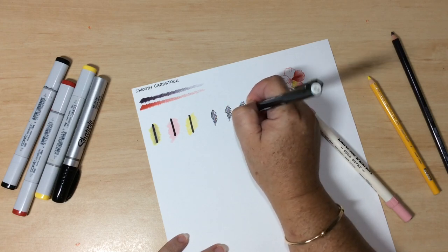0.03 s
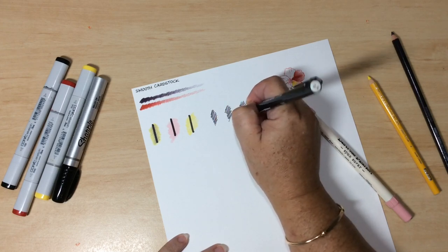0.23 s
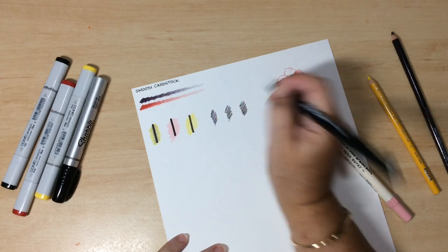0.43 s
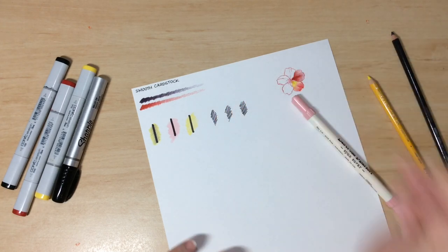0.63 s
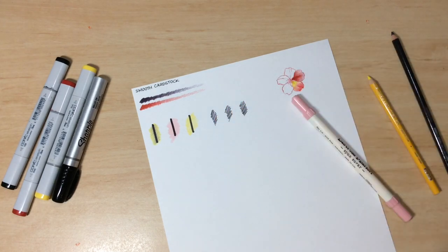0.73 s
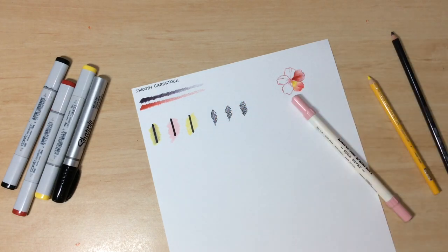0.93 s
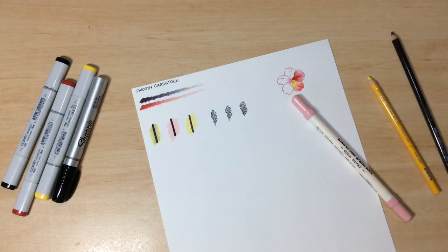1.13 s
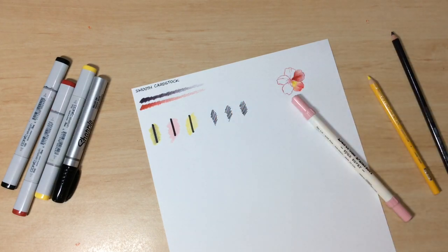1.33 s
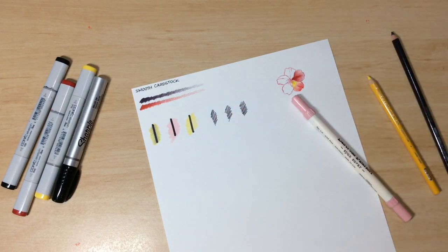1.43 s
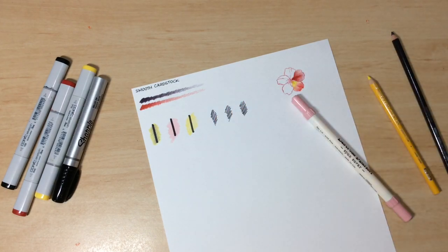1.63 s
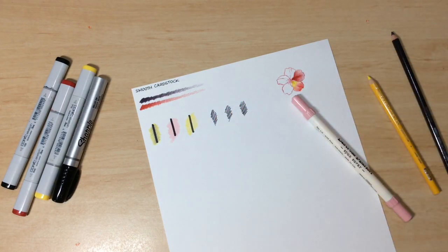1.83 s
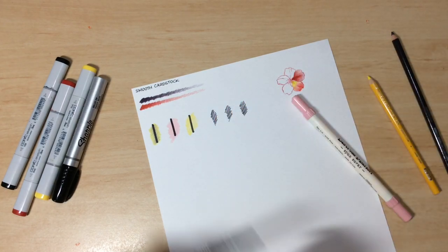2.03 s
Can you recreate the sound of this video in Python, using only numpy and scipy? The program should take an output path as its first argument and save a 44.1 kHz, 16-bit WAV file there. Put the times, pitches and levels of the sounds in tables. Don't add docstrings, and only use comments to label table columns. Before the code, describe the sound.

A plastic pen cap snaps shut sharply at about 1.87 seconds, preceded from 1.74 by a quick cluster of ticks, a brief scraping rub and tiny squeak. Earlier, faint pen strokes scratch paper from 0 to 0.35, then soft rustles and barely audible touches; a dull woody knock lands at 1.19. Faint ticks follow the snap. Close microphone, small room, steady low fan hum and soft hiss.

```python
import sys
import numpy as np
from scipy import signal
from scipy.io import wavfile
from scipy.ndimage import uniform_filter1d

SR = 44100
rng = np.random.default_rng(int(sys.argv[2]) if len(sys.argv) > 2 else 0)


def undo_db(level):
    steps = np.asarray(level, float) / 20
    return 10 ** steps


def master_out(mix):
    frames = np.transpose(np.atleast_2d(mix))
    ceiling = np.clip(frames, -1, 1)
    pcm = np.round(ceiling * 32767).astype(np.int16)
    wavfile.write(sys.argv[1], SR, pcm)


N = 91463
T = np.arange(N) / SR


def band(x, hz, width_hz):
    return signal.lfilter(*signal.iirpeak(min(hz, 0.45 * SR), hz / width_hz, fs=SR), x)


def highpass(x, hz):
    return signal.sosfilt(signal.butter(2, hz, "high", fs=SR, output="sos"), x)


def unit(x):
    return x / np.sqrt(np.mean(x ** 2))


def walk(rate_hz):
    k = int(SR / rate_hz)
    return unit(uniform_filter1d(uniform_filter1d(rng.standard_normal(N), k), k))


def noise_band(hz, width_hz):
    return unit(band(rng.standard_normal(N), hz, width_hz))


def band_sum(x, bands):
    return sum(undo_db(db) * band(x, hz, width_hz) for hz, width_hz, db in bands)


# (frequency [Hz], width [Hz], level [dB])
CRACK_BANDS = [(3470, 2100, 6.5), (5600, 1700, 3), (8000, 2200, 1.5), (13900, 3100, -15)]


def add_contact(out, at_s, modes, crack_db):
    rise_cycles, crack_rise_s, crack_decay_s = 0.52, 0.0001, 0.00052
    i = int(at_s * SR) + 1
    t = T[i:i + 4096] - at_s
    ring = np.zeros(len(t))
    for k, (hz, db, t60_s) in enumerate(modes):
        sign = (-1) ** (k + 1)
        swell = 1 - np.exp(-t * max(hz, 1500) / rise_cycles)
        ring += sign * undo_db(db - 60 * t / t60_s) * np.sin(2 * np.pi * hz * t) * swell
    burst = rng.standard_normal(len(t)) * np.exp(-t / crack_decay_s) * (1 - np.exp(-t / crack_rise_s))
    out[i:i + 4096] += ring + undo_db(crack_db + 8) * band_sum(burst, CRACK_BANDS)


def strike(times_s, contacts, modes, centre_hz):
    out = np.zeros(N)
    for at_s, (db, tilt_db_oct, crack_db) in zip(times_s, contacts):
        tilted = [(hz, db + mode_db + tilt_db_oct * np.log2(hz / centre_hz), t60_s)
                  for hz, mode_db, t60_s in modes]
        add_contact(out, at_s, tilted, db + crack_db)
    return out


# (frequency [Hz], level [dB], t60 [s])
CAP_MODES = [(334, -14.5, 0.0082), (640, -16, 0.014), (1400, -33, 0.012), (2742, -0.5, 0.051),
             (3200, -22.5, .015), (4060, -4, 0.017), (5160, -7, 0.0035), (5944, -1.5, 0.014),
             (6260, -25.5, 0.0086), (8180, 1.5, 0.0057), (9060, -5, 0.0062), (9830, -12, 0.0083),
             (12400, -38, .007), (14000, -24.5, .003)]
SNAP_TIMES = [1.8641, 1.8644, 1.8649, 1.8684, 1.8716, 1.8750, 1.8862]
# (level [dB], brightness [dB/octave], crack [dB])
SNAP_CONTACTS = [
    (-44, -3.5, -3),
    (-19.5, 14, -4.5),
    (-16, 1.5, -1),
    (-21, 13, -0.5),
    (-32, 7.5, 1.5),
    (-36.5, -2.5, -14),
    (-58.5, -4, -16),
]


def cap_snap():
    return strike(SNAP_TIMES, SNAP_CONTACTS, CAP_MODES, 6300)


# (time [s], level [dB], low ring [Hz], high ring [Hz], high ring level [dB])
TICKS = [(.735, -54, 2280, 2380, 7), (1.7432, -44, 3280, 4400, 2), (2.064, -53, 6000, 12000, -2.5),
         (.546, -59, 10800, 12500, 2), (1.093, -52.5, 11500, 14000, 2), (1.66, -42, 4800, 9400, -20),
         (1.700, -51, 5500, 11000, -6), (1.7444, -28, 1750, 6000, -2.5), (1.755, -50, 4000, 7000, -20),
         (1.7737, -33, 1300, 5500, -13), (1.7754, -35, 2700, 5600, 7), (1.7835, -40.5, 2000, 5800, 11),
         (1.7894, -35, 2600, 5600, -4), (1.7926, -52, 2900, 5800, -5), (1.8252, -30, 2700, 10500, 10),
         (1.8276, -38.5, 1226, 9100, 14.5), (1.8287, -26, 5500, 9400, 6.5), (1.8308, -26.5, 3000, 8700, 3),
         (1.8345, -45, 2900, 12000, 5), (2.003, -45, 9000, 13000, -6)]


def plastic_ticks():
    cycles = 13
    out = np.zeros(N)
    for at_s, db, low_hz, high_hz, high_db in TICKS:
        modes = [(low_hz, db, cycles / low_hz), (high_hz, db + high_db, 1.8 * cycles / high_hz)]
        add_contact(out, at_s, modes, db - 14)
    return out


# (frequency [Hz], level [dB], t60 [s])
NIB_PING = [(4850, -57, 0.024), (6000, -67, .01)]


def nib_flick():
    out = np.zeros(N)
    add_contact(out, 0.290, NIB_PING, -80)
    return out


# (time [s], level [dB])
RUB_LEVEL = [
    (1.788, -70),
    (1.791, -42.5),
    (1.803, -54),
    (1.821, -47.5),
    (1.822, -45),
    (1.831, -36),
    (1.837, -48.5),
    (1.846, -95),
    (1.863, -42.5),
]
# (frequency [Hz], width [Hz], level [dB])
RUB_BANDS = [(880, 900, -5), (2760, 4300, 8), (5800, 2200, -8.5), (8200, 2900, -25), (12000, 5000, -20)]


def cap_rub():
    noise = rng.standard_normal(N)
    grain_db = np.minimum(3.0 * rng.exponential(size=N), 9)
    grains = noise * undo_db(grain_db) * undo_db(1.5 * walk(500))
    s, db = np.array(RUB_LEVEL).T
    rubbing = (T > s[0]) * (T < s[-1])
    return unit(band_sum(grains, RUB_BANDS)) * undo_db(np.interp(T, s, db)) * rubbing


# (frequency [Hz], width [Hz], level [dB])
SQUEAK_LINES = [(6120, 190, -31), (7940, 440, -31), (2800, 370, -58)]


def cap_squeak():
    end_s, rise_s = 1.864, 0.0022
    creep = np.exp(np.minimum(T - end_s, 0) / rise_s) * (T < end_s)
    return creep * sum(undo_db(db) * noise_band(hz, width_hz) for hz, width_hz, db in SQUEAK_LINES)


# (frequency [Hz], level [dB], t60 [s])
DESK_MODES = [(148, -13.5, 0.044), (343, -1.5, 0.027), (615, -6, .015), (853, -8, 0.018),
              (1118, -0.5, 0.021), (1520, 1.5, 0.02), (1890, 2, 0.042), (2370, -10, 0.017),
              (2600, -6.5, 0.011), (3160, -3, 0.021), (3550, -5, 0.0098), (4060, -10.5, .012),
              (5600, -21, 0.017), (12000, -9.5, 0.0055)]
KNOCK_TIMES = [.7365, .985, 1.156, 1.645, 1.1921, 1.1930, 1.1945, 1.1953]
# (level [dB], brightness [dB/octave], crack [dB])
KNOCK_CONTACTS = [
    (-60.5, -4.5, -25),
    (-62.5, -5, -22),
    (-57, 0.5, -6),
    (-59, -1.5, -30),
    (-34.5, 3.5, -14.5),
    (-37, 1.5, -18),
    (-27, -1, -12.5),
    (-40, 6.5, 8.5),
]


def desk_knocks():
    return strike(KNOCK_TIMES, KNOCK_CONTACTS, DESK_MODES, 1980)


# (start [s], length [s], level [dB], nib ring [dB])
STROKES = [(0.017, .055, -74.5, 4), (0.114, .062, -72, 4.5), (0.227, 0.029, -76, 5), (0.316, 0.042, -75, 2),
           (0.51, .07, -88, -20), (0.574, 0.12, -83.5, -42), (0.705, 0.068, -80, 5.5),
           (0.856, 0.18, -74, -25), (0.97, 0.025, -70, -23), (1.289, 0.11, -71, -19),
           (1.372, 0.18, -72, -18)]
# (frequency [Hz], width [Hz], level [dB])
NIB_BANDS = [(5800, 1200, -5), (7700, 700, 0), (9900, 1200, -3), (12800, 1000, -5)]


def paper():
    noise = rng.standard_normal((2, N)) * undo_db(1.4 * walk(120))
    nib = unit(band_sum(noise[0], NIB_BANDS))
    hand = unit(band(noise[1], 7500, 16000))
    out = np.zeros(N)
    for at_s, length_s, db, nib_db in STROKES:
        swell = np.sin(np.pi * np.clip((T - at_s) / length_s, 0, 1)) ** 0.7
        out += undo_db(db) * swell * (undo_db(nib_db) * nib + undo_db(-8 - 0.4 * nib_db) * hand)
    return out


# (frequency [Hz], t60 [s], level [dB])
ROOM = [(300, 0.38, -20.5), (895, 0.18, -15), (2540, 0.27, -17.5), (4960, 0.22, -13.5), (9000, 0.27, -20),
        (14000, 0.19, -14)]


def room(x):
    onset_s, early_t60_s, early_db = 0.004, 0.035, 8
    t, out, patchy_db = T[:SR // 2], x, 1.2 * walk(150)
    hz, t60s_s, dbs = np.array(ROOM).T
    for f in 200 * 2 ** np.arange(0, 6.4, 1 / 5):
        t60_s = np.interp(np.log(f), np.log(hz), t60s_s)
        db = np.interp(np.log(f), np.log(hz), dbs)
        decay = undo_db(-120 * t / t60_s) + undo_db(2 * early_db - 120 * t / early_t60_s)
        decay = decay * np.clip(t / onset_s, 0, 1) * 100 / SR
        direct = band(band(x, f, f / 5), f, f / 5)
        power = np.maximum(signal.fftconvolve(direct ** 2, decay)[:N], 0)
        diffuse = unit(band(band(rng.standard_normal(N), f, f / 5), f, f / 5))
        out = out + undo_db(db + patchy_db) * np.sqrt(power) * diffuse
    return out


# (frequency [Hz], level [dB/Hz])
AIR = [(35, 1.5), (130, -9.5), (500, -6), (1100, -11), (2300, -11), (5000, -34.5), (11000, -27),
       (15400, -46)]


def fan_air():
    hz, db = np.array(AIR).T
    swell, air = walk(3.7), 0
    for f in 30 * 2 ** np.arange(0, 9.1, 0.5):
        level_db = np.interp(np.log(f), np.log(hz), db) + 0.18 * swell + 1.0 * walk(3)
        width_hz = f * 0.69
        air = air + undo_db(level_db) * band(band(rng.standard_normal(N), f, width_hz), f, width_hz)
    return unit(air)


def fan_rumble(hum_hz):
    width_hz = 21.4
    return unit(band(band(rng.standard_normal(N), hum_hz, width_hz), hum_hz, width_hz))


# (frequency [Hz], width [Hz], level [dB])
FAN_LINES = [(582, 79, -75.5), (1032, 120, -70.5), (1317, 120, -73.5), (1944, 16, -78.5)]


def fan_lines():
    return sum(undo_db(db + 2.5 * walk(4)) * noise_band(hz, width_hz) for hz, width_hz, db in FAN_LINES)


def fan_tone(hum_hz):
    level = undo_db(-67 + 2.0 * walk(21))
    wobble_hz = 3.92 * walk(11)
    return level * np.sin(2 * np.pi * np.cumsum(hum_hz + wobble_hz) / SR)


def fan():
    hum_hz = 71.4
    air = undo_db(-63) * fan_air()
    rumble = undo_db(-63.5) * fan_rumble(hum_hz)
    fade_db = -1 * (T - 1.5)
    return (air + fan_lines()) * undo_db(fade_db) + rumble + 1.1 * fan_tone(hum_hz)


def scene():
    cap = highpass(cap_snap() + plastic_ticks() + nib_flick() + cap_rub() + cap_squeak(), 190)
    desk = highpass(desk_knocks(), 92)
    return (room(desk + cap) + paper() + fan())[None]


def top_cut(x):
    return signal.sosfilt(signal.butter(12, 16930, fs=SR, output="sos"), x)


def record(dry):
    lowpass = signal.ellip(6, 0.3, 45, 15800, fs=SR, output="sos")
    mix = signal.sosfilt(lowpass, highpass(dry, 52))
    return top_cut(mix)


dry = scene()
out = record(dry)
master_out(out)
```